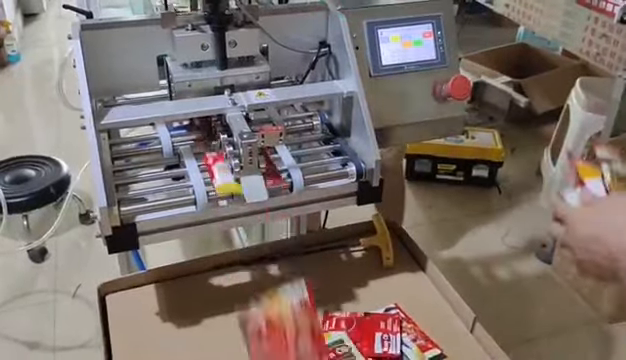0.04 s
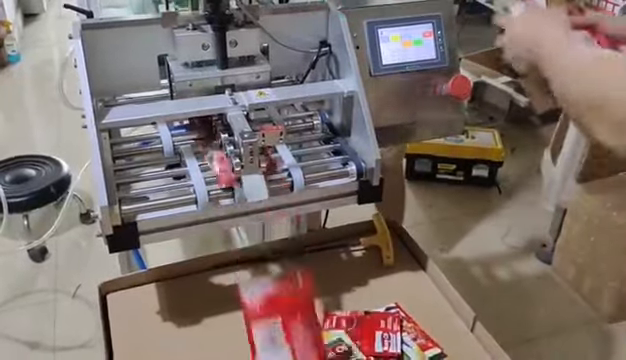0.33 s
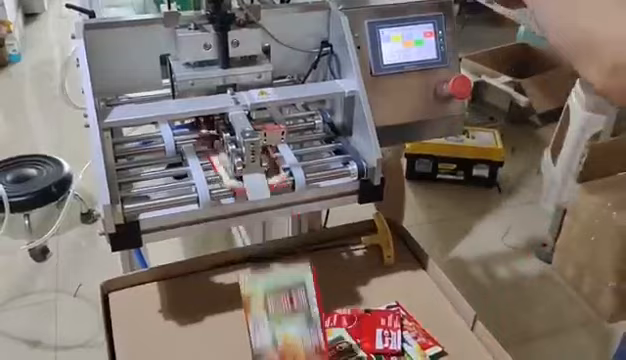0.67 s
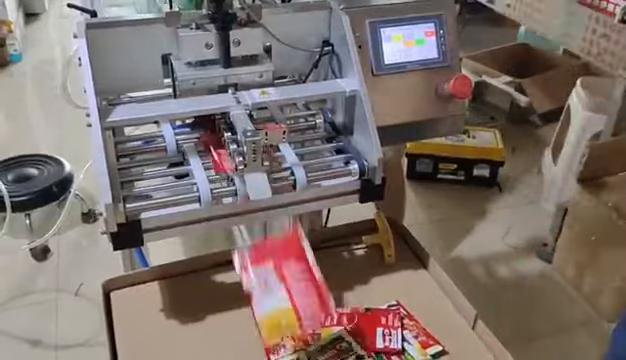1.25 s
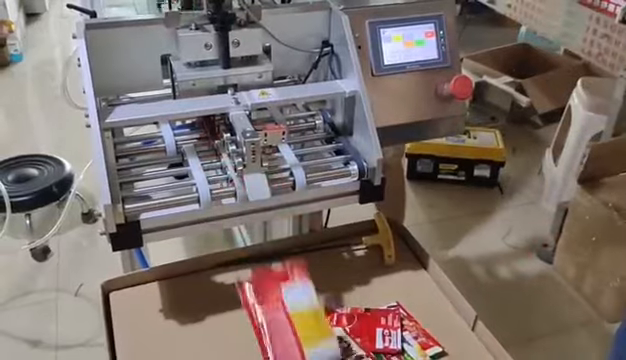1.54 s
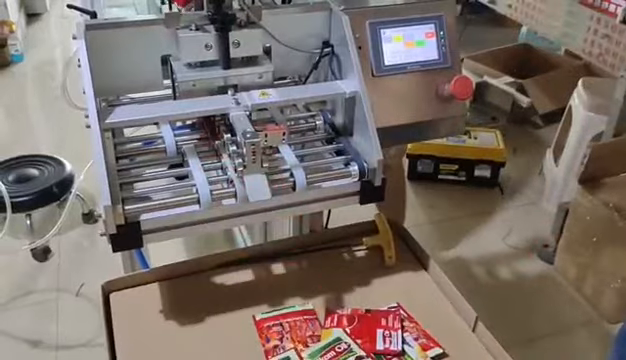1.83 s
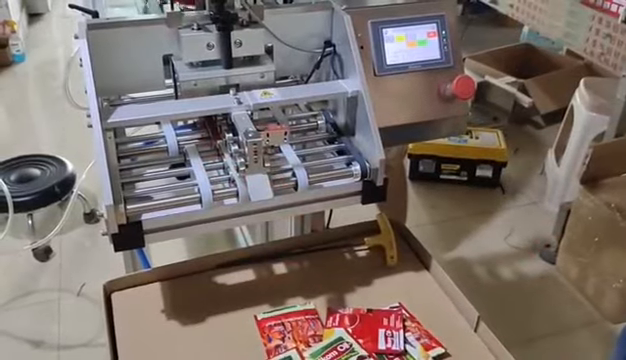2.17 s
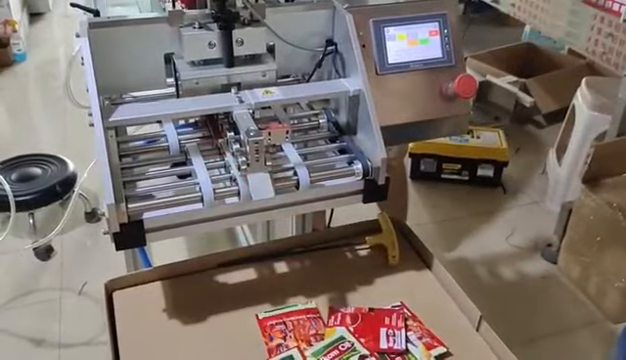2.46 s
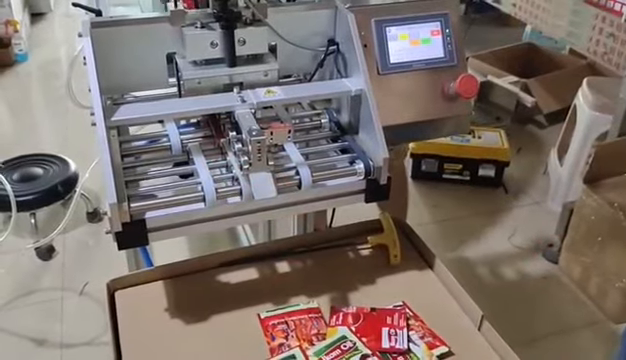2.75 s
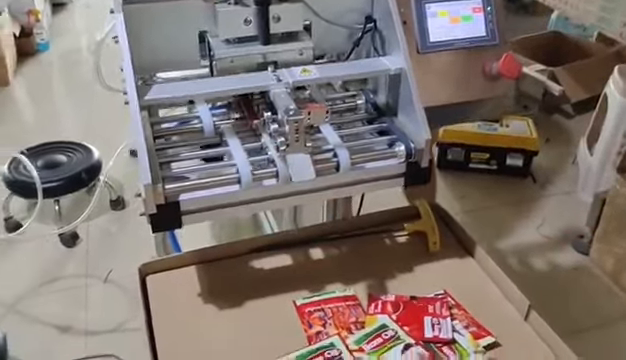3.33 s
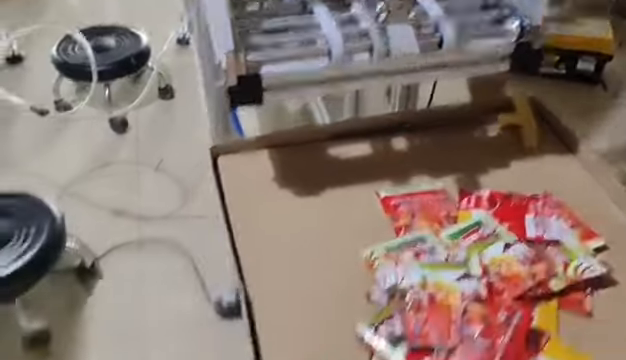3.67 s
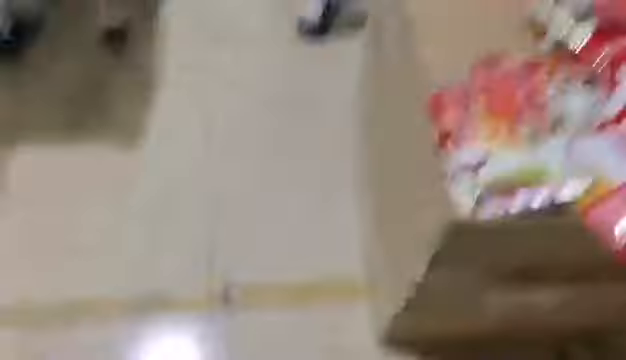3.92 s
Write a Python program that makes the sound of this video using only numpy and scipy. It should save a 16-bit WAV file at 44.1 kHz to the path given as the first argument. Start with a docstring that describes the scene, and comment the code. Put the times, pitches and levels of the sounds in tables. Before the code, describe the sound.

In a hissy workshop, a machine flicks out plastic packets with quick crackles and scrapes, ending in a soft landing in a box. Humming and rumbling rise, metal clacks sharply, and moving air thumps unevenly on the microphone.

```python
"""Friction feeder flicking packets into a box

Crinkly packets rub, crackle and clatter over the rollers, then thud into cardboard at about 1.7 s.
The motor hum swells with a dull rumble, and a metal part knocks and rings. Moving air then buffets
the microphone, its bass ducking the mix, until the sound stops short. Workshop hiss lies underneath."""
import sys
import numpy as np
from scipy import signal
from scipy.fft import rfft, irfft
from scipy.io import wavfile
from scipy.ndimage import uniform_filter1d

SR = 44100
rng = np.random.default_rng(int(sys.argv[2]) if len(sys.argv) > 2 else 0)


def transcribe(signal):
    """Save signal, clipped to [-1, 1], as a 16-bit WAV file at the path in sys.argv[1]."""
    frames = np.atleast_2d(signal).T
    limited = np.clip(frames, -1, 1)
    pcm = np.round(limited * 32767).astype(np.int16)
    wavfile.write(sys.argv[1], SR, pcm)


N = 176400
TIME = np.arange(N) / SR


def packets():
    """Wrappers rub, scrape and crackle as they slide through; sharp creases snap out on top."""
    # Each row: time in seconds, rustle level in dB.
    rustle_level = [(0,-45),(.16,-43),(.21,-45),(.3,-47),(.44,-41.5),(.54,-46),(.66,-42.5),(.85,-46),(.98,-45),(1.14,-40),(1.33,-44),(1.44,-46),(1.55,-44.5),(1.7,-80)]
    # Each row: time in seconds, level of the fine, bright crackle in dB.
    crackle_level = [(0,-43.5),(.09,-58),(.26,-61.5),(.33,-47.5),(.44,-58.5),(.55,-67.5),(.63,-47.5),(.8,-53.5),(.98,-65),(1.19,-42),(1.3,-60),(1.37,-48),(1.45,-67),(1.52,-48),(1.62,-94)]
    # Tone of the rub, the crackle and the creases. Each row: frequency in Hz, relative level in dB.
    rub_tone = [(100,-27),(300,-22.5),(700,-16.5),(1100,-3.5),(2150,2.5),(2500,2.5),(3000,9.5),(3750,10.5),(4250,5),(5800,7),(6400,-20),(8500,-9.5),(12000,-64.5)]
    crackle_tone = [(200,-29.5),(1500,-17),(5500,6),(8800,8.5),(9800,0),(11700,2)]
    crease_tone = [(200,-22),(900,-5.5),(3500,10.5),(5700,16.5),(7000,3.5),(12000,-29)]
    # Scrape over the rollers. Each row: time in seconds, pitch in Hz, level in dB.
    scrape_path = [(0,2973,-57),(.16,3110,-47.5),(.3,3865,-44),(.56,4000,-66),(1.15,3304,-55.5),(1.65,3330,-75.5)]
    # Single sharp creases. Each row: start in seconds, relative level in dB.
    creases = [(0.018,-25),(0.102,-29.5),(.148,-27.5),(.367,-31),(.614,-31),(.637,-34.5),(0.665,-36),(0.716,-28),(.788,-28.5),(0.881,-26.5),(1.116,-26),(1.149,-26),(1.170,-30.5),(1.182,-23),(1.208,-26),(1.251,-31),(1.286,-29.5),(1.342,-30.5),(1.496,-30)]
    rub = colour(grains(per_s=5000, spread_db=5.5), rub_tone)
    rub = patchy(rub, depth_db=4.8, frames=5, bins=3, size=1024)
    crinkle = amp(-7) * colour(crinkles(per_s=220, spread_db=4), crease_tone)
    rustle = (rub + crinkle) * amp(curve(rustle_level))
    scrape = fuzzy(curve(scrape_path), width_hz=470) * amp(curve(scrape_path, column=2))
    crackle = colour(crinkles(per_s=500, spread_db=4.5), crackle_tone)
    crackle = patchy(crackle, depth_db=5, frames=6, bins=6, size=512)
    crackle *= amp(curve(crackle_level) + 2.5 * drift(36))  # fast flicker
    snaps = np.zeros(N)
    for start, db in creases:
        add(snaps, start, amp(db - 6.5) * burst(t60=0.038, rise_s=0.00026))
    sliding = (rustle + scrape + crackle) * (TIME < rustle_level[-1][0])
    return room(sliding + colour(snaps, crease_tone), wet_db=-18.5)


def feeder():
    """Packets clatter over the rollers in small hollow knocks; a low drone swells once."""
    # Each row: time in seconds, clatter level in dB.
    clatter_level = [(0,-48.5),(.12,-50.5),(.24,-52.5),(.54,-53.5),(.66,-48),(.78,-72),(.88,-54),(1.02,-59.5),(1.3,-46.5),(1.62,-68.5)]
    # Hollow tone of the rollers. Each row: frequency in Hz, relative level in dB.
    roller_tone = [(400,-16),(650,8),(800,-0.5),(1050,5.5),(1750,1.5),(2200,5),(3500,-29.5)]
    clatter = colour(grains(per_s=300, spread_db=-1.5), roller_tone)
    clatter = patchy(clatter, depth_db=4.8, frames=8, bins=4, size=1024) * amp(curve(clatter_level))
    swell = np.exp(-((TIME - 1) / 0.1) ** 2)  # peaks at 1 s
    drone = fuzzy(385.5, width_hz=170) * amp(-54.5) * swell
    return clatter * (TIME < clatter_level[-1][0]) + drone


def box():
    """Packets tap the frame and the box, and land with soft, hollow blows on cardboard."""
    # Dull landings. Each row: start in seconds, level in dB, 60 dB decay time in seconds.
    landings = [(1.687,-41,0.34),(1.715,-37,0.18)]
    # Body of the cardboard. Each row: frequency in Hz, relative level in dB.
    box_tone = [(80,-45),(420,14),(680,6),(900,-1.5),(1300,-2),(3000,-41),(9000,-61)]
    # Hollow taps. Each row: start in seconds, level in dB, pitch in Hz, 60 dB decay time in seconds.
    tap_hits = [(.343,-44,654,0.31),(0.662,-35,2256,0.064)]
    blows, taps = np.zeros(N), np.zeros(N)
    for start, db, t60 in landings:
        add(blows, start, amp(db) * burst(t60, rise_s=0.0013))
    attack = np.minimum(TIME / 0.00063, 1)
    for start, db, hz, t60 in tap_hits:
        add(taps, start, amp(db) * fuzzy(hz, width_hz=150) * attack * decay(TIME, t60))
    return room(colour(blows, box_tone) + taps, wet_db=-3)


def knock():
    """A metal part clacks, rattles and rings briefly and roughly."""
    # The knock and its rattles. Each row: start in seconds, level in dB, 60 dB decay time in seconds.
    hits = [(2.3792,-32.5,.018),(2.3874,-22,0.016),(2.400,-34,0.066)]
    # Tone of the clack. Each row: frequency in Hz, relative level in dB.
    clack_tone = [(100,-30),(350,16.5),(750,3.5),(1050,3.5),(1500,2.5),(1950,-6),(2700,4.5),(3700,2.5),(5000,-8),(7500,-12),(12000,-26.5)]
    # Ring of the metal. Each row: pitch in Hz, relative level in dB, 60 dB decay time in seconds.
    modes = [(1464,-27,0.2),(2586,-19,0.63),(3400,-16,0.2)]
    clack, ring, t = np.zeros(N), np.zeros(N), TIME[:SR // 2]
    for start, db, t60 in hits:
        add(clack, start, amp(db) * burst(t60, rise_s=0.00025))
        for hz, mode_db, ring_s in modes:
            mode = fuzzy(hz, width_hz=70)[:len(t)] * decay(t, ring_s)
            add(ring, start, amp(db + mode_db) / np.sqrt(2) * mode)
    return room(colour(clack, clack_tone), wet_db=-5) + ring


def air():
    """Air buffets the microphone in gusts and single puffs; brighter eddies join in as it grows."""
    # Each row: time in seconds, gust strength in dB.
    gusts = [(2.38,-80),(2.43,-34.5),(2.5,-38.5),(2.54,-20),(2.59,-28.5),(2.76,-35),(2.86,-41),(2.94,-30),(3.01,-49),(3.08,-36),(3.2,-49),(3.25,-37),(3.36,-23),(3.43,-21),(3.49,-41),(3.54,-31.5),(3.63,-28.5),(3.77,-49.5)]
    # Tone of the deep buffeting and of the eddies. Each row: frequency in Hz, relative level in dB.
    buffet_tone = [(38,-36.5),(65,-9),(95,1.5),(150,-0.5),(220,-3.5),(330,-12),(500,-25),(800,-52),(2000,-60)]
    eddy_tone = [(40,-33.5),(150,4.5),(300,10.5),(540,1),(750,-13.5),(1000,-31),(2500,-52)]
    # Single puffs. Each row: centre in seconds, peak in dB, pitch in Hz, half-width in seconds.
    puff_hits = [(1.989,-28,106,0.0058),(2.552,-10.5,390,0.00096),(3.075,-30.5,168.3,0.022),(3.461,-18.5,230,0.00098),(3.634,-20,149,0.0098)]
    strength_db = curve(gusts)
    buffet = unit(colour(rng.standard_normal(N), buffet_tone)) * amp(strength_db - 2)
    eddy_db = -33.5 + 2.33 * (strength_db + 24.5)  # eddies grow faster than the gust
    eddies = unit(colour(grains(per_s=400, spread_db=0), eddy_tone)) * amp(eddy_db)
    puffs = np.zeros(N)
    for centre, db, hz, width in puff_hits:
        t = TIME - centre
        puffs += amp(db) * np.exp(-(t / width) ** 2) * np.cos(2 * np.pi * hz * t)
    return (buffet + eddies) * (TIME > gusts[0][0]) + puffs


def motor():
    """A hum roughened by a narrow flutter around its pitch, and a fuzzy whistle that comes and goes."""
    # Partials of the hum. Each row: pitch in Hz, relative level in dB.
    partials = [(269.4,-4),(163.3,-18)]
    # Each row: time in seconds, hum level in dB.
    hum_level = [(0,-57),(.45,-52),(1.5,-51.5),(1.85,-40),(2.3,-37.5),(3.15,-41.5),(3.35,-66.5),(3.78,-55.5)]
    # Faint whistle of running machinery. Each row: time in seconds, pitch in Hz, level in dB.
    whistle_path = [(1.8,1981,-64),(2.13,2030,-52.5),(2.6,2130,-69),(3.1,2147,-57.5),(3.27,2177,-51),(3.4,2090,-74)]
    hum = np.zeros(N)
    for hz, db in partials:
        wavering_hz = hz + 1.9 * drift(4.1)
        hum += amp(db) * np.sin(2 * np.pi * np.cumsum(wavering_hz) / SR)
    flutter = fuzzy(partials[0][0], width_hz=24) * amp(-60)
    whistle = fuzzy(curve(whistle_path), width_hz=130) * amp(curve(whistle_path, column=2))
    return np.sqrt(2) * hum * amp(curve(hum_level)) + flutter + whistle


def workshop():
    """A bed of hiss, and a dull rumble that swells once the packets have passed."""
    # Tone of each layer. Each row: frequency in Hz, relative level in dB.
    hiss_tone = [(30,-23.5),(90,-4.5),(170,9),(300,8.5),(480,1),(1400,4.5),(1750,1.5),(2100,4),(4300,-3.5),(6500,-9.5),(8700,-11),(9400,-20.5),(12000,-27)]
    rumble_tone = [(30,-29.5),(75,-21),(220,2),(380,-1.5),(680,-11.5),(800,-20.5),(5000,-50.5)]
    # Rise and fall of each layer. Each row: time in seconds, level in dB.
    hiss_level = [(0,-52),(1.4,-49),(1.7,-49.5),(3,-49.5),(3.76,-48)]
    rumble_level = [(0,-84),(1.6,-62.5),(1.8,-45),(1.94,-40.5),(2.08,-45.5),(2.22,-39.5),(2.6,-56.5),(3.78,-52)]
    hiss = patchy(colour(rng.standard_normal(N), hiss_tone), depth_db=3.2, frames=7, bins=3, size=1024)
    rumble = colour(rng.standard_normal(N), rumble_tone)
    rumble = patchy(rumble, depth_db=2, frames=4, bins=2, size=2048)
    return hiss * amp(curve(hiss_level) + drift(28)) + rumble * amp(curve(rumble_level))


def room(x, wet_db, size=256):
    """Adds the workshop's short reflections, which linger longest in the upper mids."""
    # Reverb tail. Each row: frequency in Hz, 60 dB decay time in seconds.
    reverb_times = [(500,0.057),(3000,0.42),(12000,0.073)]
    reflections = rng.standard_normal(SR // 2) * np.minimum(TIME[:SR // 2] / 0.002, 1)
    hz, t, spectra = signal.stft(reflections, SR, nperseg=size)
    tail = signal.istft(spectra * decay(t, read(reverb_times, hz)[:, None]), SR, nperseg=size)[1]
    return x + amp(wet_db) * signal.fftconvolve(x, tail / np.linalg.norm(tail))[:N]


def grains(per_s, spread_db):
    """Clicks at random times; spread_db sets how uneven they are."""
    sizes = amp(spread_db * np.minimum(rng.exponential(1, N), 2.68)) * rng.choice([-1, 1], N)
    return unit(sizes * (rng.random(N) < per_s / SR))


def crinkles(per_s, spread_db, decay_s=0.002):
    """Random tiny creases, each a puff of noise a few milliseconds long."""
    power = signal.oaconvolve(grains(per_s, spread_db) ** 2, np.exp(-TIME[:SR // 20] / decay_s))[:N]
    return unit(np.sqrt(abs(power)) * rng.standard_normal(N))


def burst(t60, rise_s):
    """A noise hit with a fast attack and a dying tail."""
    t = TIME[:SR // 2]
    return rng.standard_normal(len(t)) * (1 - np.exp(-t / rise_s)) * decay(t, t60)


def fuzzy(hz, width_hz):
    """Pitched noise in one resonance."""
    phase = 2 * np.pi * np.cumsum(hz * np.ones(N)) / SR
    return unit(drift(width_hz) * np.cos(phase) + drift(width_hz) * np.sin(phase))


def drift(hz):
    """Random wander of rms 1, rolling off above the given rate."""
    f = np.fft.rfftfreq(N, 1 / SR)
    return unit(irfft(rfft(rng.standard_normal(N)) * (f > 1) / (1 + (f / hz) ** 2) ** 2, N))


def patchy(x, depth_db, frames, bins, size):
    """Shifts the tone at random in patches of time and frequency; returns rms 1."""
    spectra = signal.stft(x, nperseg=size)[2]
    patches = uniform_filter1d(rng.standard_normal(spectra.shape), frames, axis=1)
    patches = unit(uniform_filter1d(patches, bins, axis=0))
    return unit(signal.istft(spectra * amp(depth_db * patches), nperseg=size)[1][:N])


def colour(x, tone, size=4096):
    """Minimum-phase EQ of unit energy that follows a tone table."""
    log_gain = np.log(amp(read(tone, abs(np.fft.fftfreq(size, 1 / SR)))))
    impulse = np.fft.ifft(np.exp(np.conj(signal.hilbert(log_gain)))).real[:size // 2]
    return signal.oaconvolve(x, impulse / np.linalg.norm(impulse))[:len(x)]


def read(points, hz):
    """Reads a table along a log-frequency axis."""
    f, value = np.transpose(points)
    return np.interp(np.log(hz + 1), np.log(f), value)


def curve(rows, column=1):
    """Automation: one column of a table, joined by straight lines in time."""
    rows = np.array(rows)
    return np.interp(TIME, rows[:, 0], rows[:, column])


def decay(t, t60):
    """An envelope that falls 60 dB in t60 seconds."""
    return np.exp(-np.log(1000) * t / t60)


def add(mix, start_s, sound):
    """Mixes a sound in at its cue."""
    part = mix[max(round(start_s * SR), 0):][:len(sound)]
    part += sound[:len(part)]


def amp(db):
    """Decibels to gain."""
    return 10 ** (np.asarray(db) / 20)


def unit(x):
    """Scales to rms 1."""
    return x / np.sqrt(np.mean(x ** 2) + 1e-20)


def scene():
    """All sources at one microphone."""
    return (packets() + feeder() + box() + knock() + motor() + workshop() + air())[None]


def record(dry):
    """Gain control ducks the mix under strong bass; the sound stops short; a steep cut trims the top."""
    threshold_db, duck_share, smooth_s = -39, 0.52, 0.023
    stop_s, cutoff_hz = 3.778, 12200
    bass = signal.sosfilt(signal.butter(2, 250, fs=SR, output="sos"), dry[0])
    bass_power = abs(uniform_filter1d(uniform_filter1d(bass ** 2, int(smooth_s * SR)), SR // 100))
    duck = (1 + bass_power / amp(threshold_db) ** 2) ** (-duck_share / 2)
    gate = np.clip((stop_s - TIME) / 0.004, 0, 1)
    lowpass = signal.firwin(511, cutoff_hz, window=("kaiser", 9), fs=SR)
    return signal.oaconvolve(dry * duck * gate, lowpass[None], "same")


dry = scene()
out = record(dry)
transcribe(out)
```